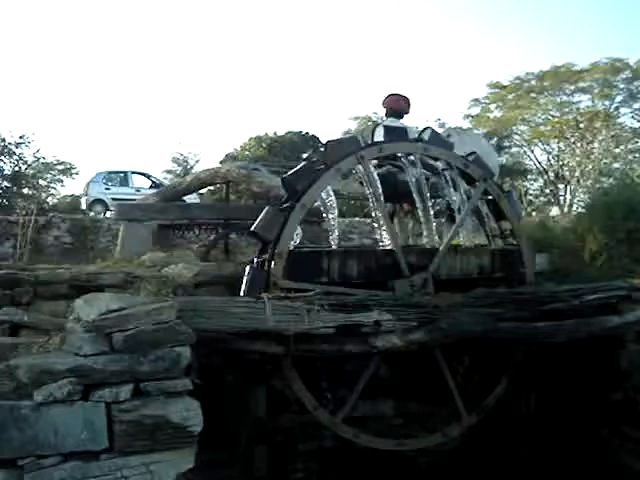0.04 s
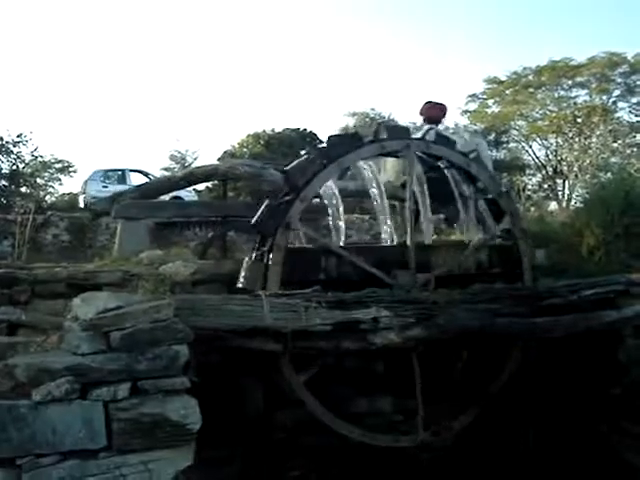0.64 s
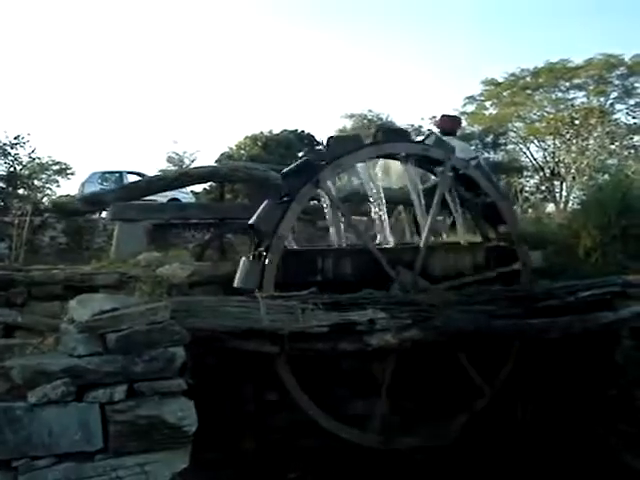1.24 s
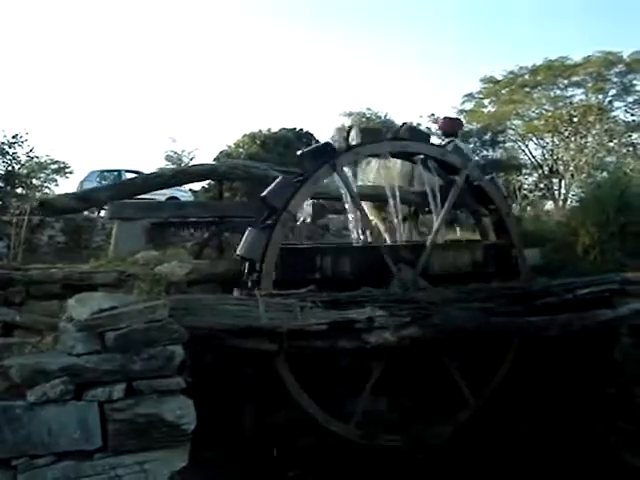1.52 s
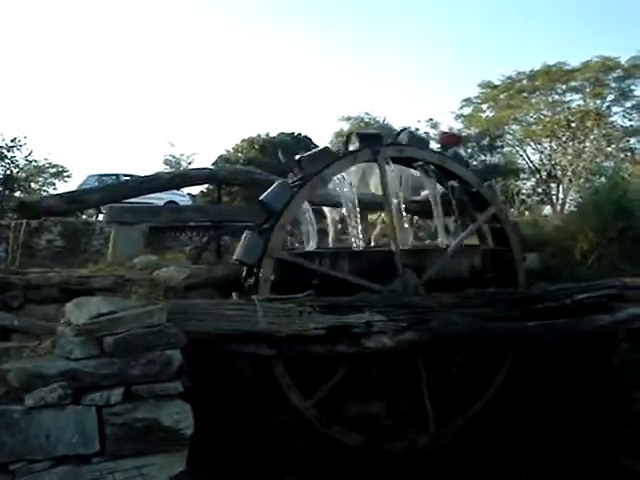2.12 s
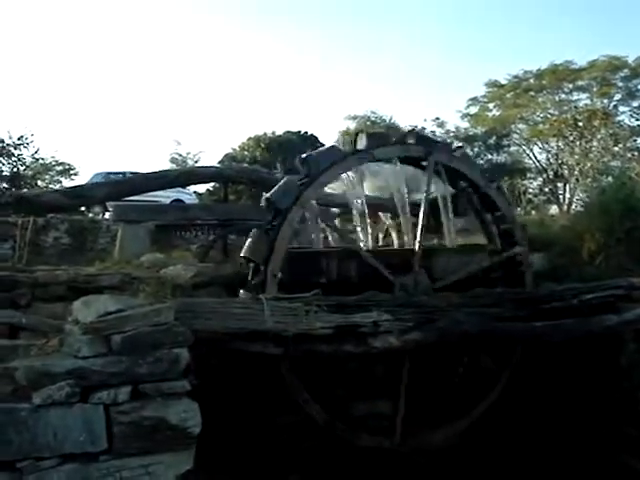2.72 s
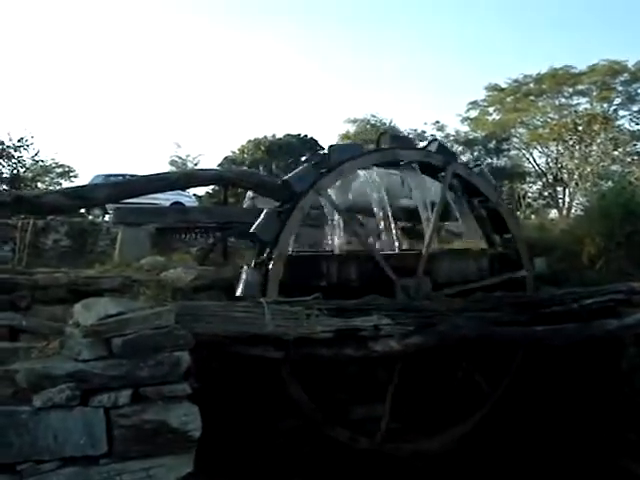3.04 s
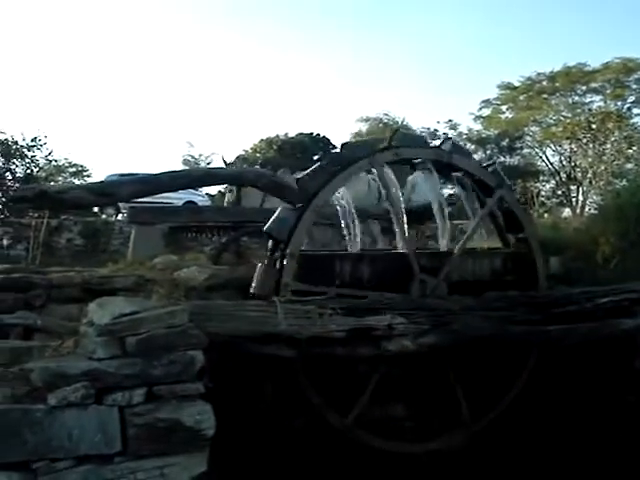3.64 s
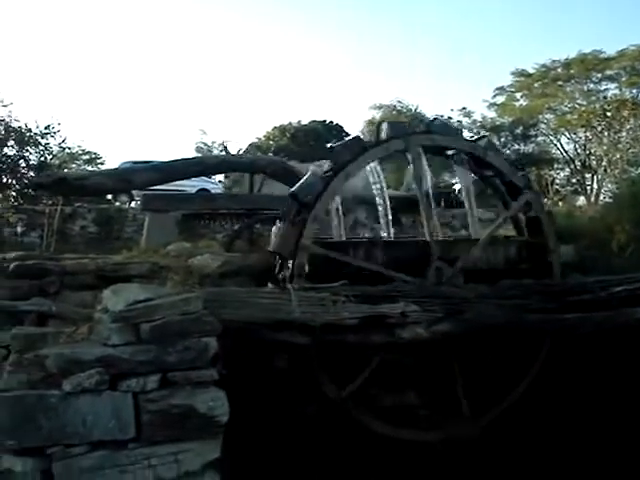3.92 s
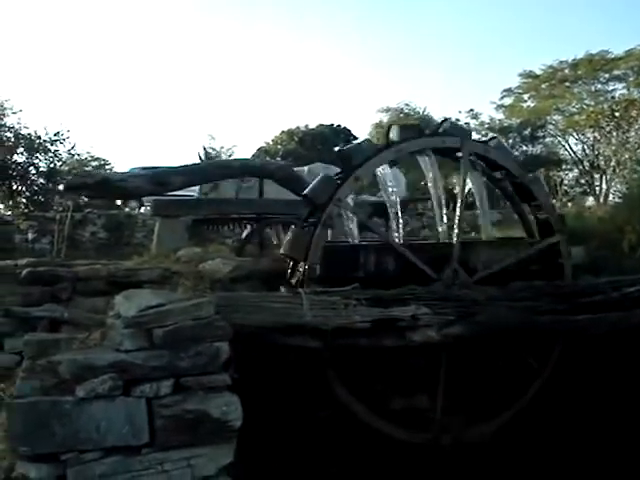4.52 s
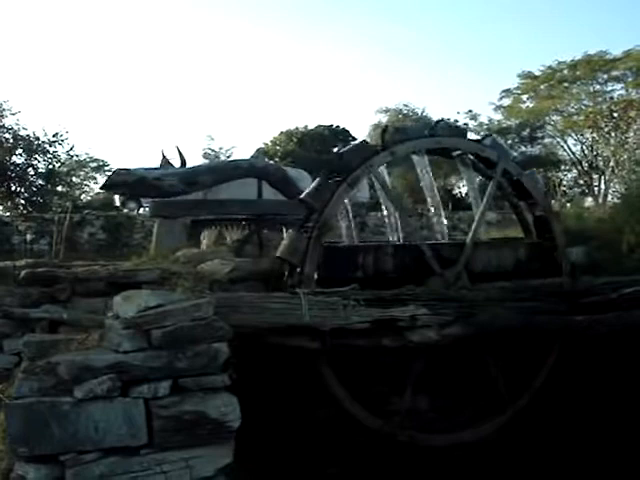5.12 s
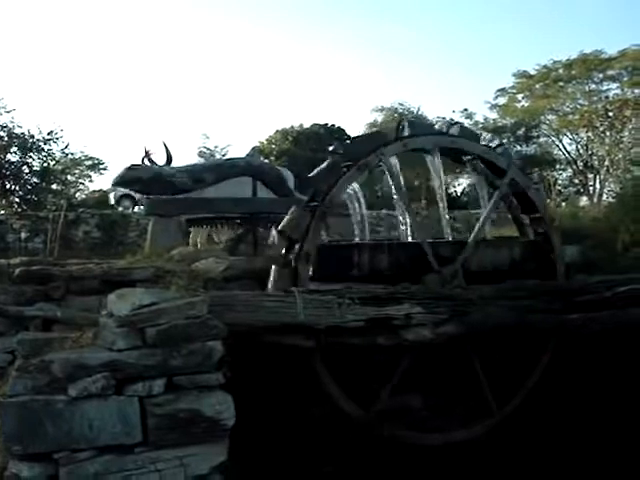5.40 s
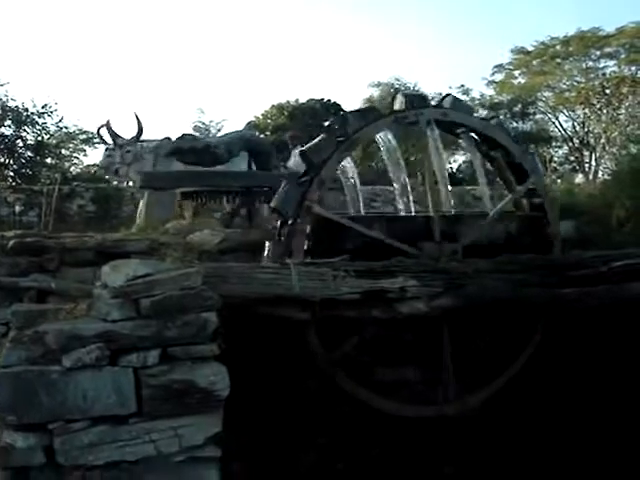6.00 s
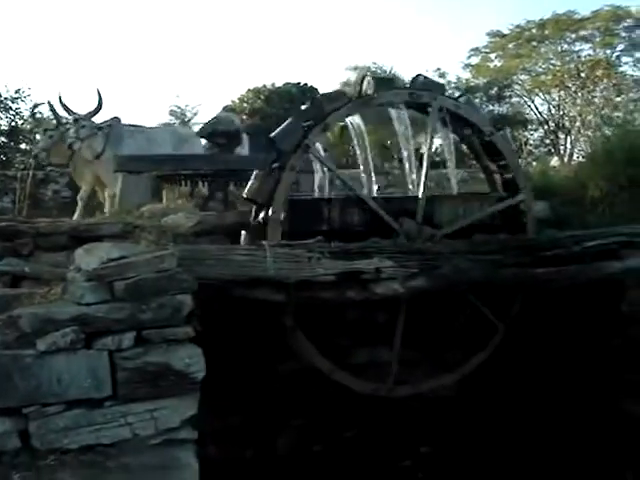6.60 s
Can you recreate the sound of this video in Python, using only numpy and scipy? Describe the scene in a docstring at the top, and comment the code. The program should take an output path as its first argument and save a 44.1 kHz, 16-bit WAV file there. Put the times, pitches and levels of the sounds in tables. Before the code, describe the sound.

Steady, ringing metal clinks from a ratchet run over the splash of a waterwheel emptying its buckets about twice a second. The water starts full, then eases, with occasional sharp slaps in the trough and hollow gurgling down the stone shaft. Short gulps, squeaks and soft thumps come from the turning wheel, mostly early on. The place is outdoors, with a short, dull echo and very faint wind on the microphone.

```python
"""Outdoors at a stone well, a bucket waterwheel turns. Its buckets empty in ragged streams that hiss,
patter and slap into a trough, while spilled water falls back and gurgles in the shaft. A steel catch
(the pawl) drops onto the next ratchet tooth three to four times a second, rings, and echoes off the
stone. Behind these come hollow knocks, gulps and squeaks, soft thumps of the frame and a faint breeze."""
import sys
import numpy as np
from scipy import signal
from scipy.fft import rfft, irfft, next_fast_len
from scipy.io import wavfile

SR = 44100
rng = np.random.default_rng(int(sys.argv[2]) if len(sys.argv) > 2 else 0)


def persist_wave(psi):
    """Save psi, clipped to +-1, as 16-bit WAV."""
    counts = np.round(np.clip(psi, -1, 1) * 32767).astype(np.int16)
    wavfile.write(sys.argv[1], SR, np.atleast_2d(counts).T)


N = 297675
TIME = np.arange(N) / SR


# the steady run of water between bucket loads: t/s, spray level/dB, trough level/dB
STEADY_FLOW = [(.32, -25.5, -31), (.85, -26, -32.5), (3.3, -30.5, -37.5), (3.59, -33, -38.5),
               (3.95, -30.5, -36), (4.29, -34.5, -35), (4.63, -33, -37.5), (5.06, -33.5, -36),
               (5.35, -39, -40), (5.84, -31.5, -38.5), (6.31, -31.5, -33.5), (6.45, -35, -35.5),
               (6.74, -31.5, -37.5)]
# how strong the spray is from low to high pitch: f/Hz, level/dB
SPRAY_TONE = [(300, -39), (1600, -15.5), (2600, -15), (3500, -11.5), (5000, -6.5), (6200, -1.5), (7000, -1),
              (7600, -8.5), (8500, -16.5), (9800, -29)]
def spray(flow_db):
    """Streams break into a hiss of drops, mist and tiny bubbles; splash and fizz flutter separately."""
    hiss = drops(per_s=8000, spread_db=5) + .62 * rng.standard_normal(N)
    hiss += .7 * bubbles(per_s=2000, low_hz=3000, high_hz=9500, cycles=100, rise=.02, spread_db=0)
    fizz = signal.sosfiltfilt(signal.butter(2, [5500, 7600], "band", fs=SR, output="sos"), hiss)
    splash = hiss - fizz
    ragged = splash * from_db(1.5 * drift(18)) + fizz * from_db(2.5 * drift(24))
    return np.hypot(from_db(flow_db) * lull(), gush()) * coloured(ragged, SPRAY_TONE)


# a bucket tips about twice a second: t/s, level/dB, time at full flow/s
BUCKET_TIPS = [(.07, -24, 0.085), (.59, -24.5, .3), (1.04, -25, 0.13), (1.561, -23.5, 0.098),
               (2.06, -24, 0.091), (2.52, -26.5, 0.24), (3.08, -31, 0.32), (3.67, -30, 0.041),
               (4.48, -29.5, 0.041), (4.7, -29, 0.032), (5.1, -34, 0.031), (5.64, -33, 0.18),
               (6.1, -33, 0.12)]
def gush(delay_s=0, rise_s=.041, fall_s=.095):
    """Strength of the water leaving the buckets: each load swells, runs, then dribbles away."""
    power = np.zeros(N)
    for s, db, hold_s in BUCKET_TIPS:
        t = TIME - s - delay_s
        swell = np.clip(t / rise_s, 0, 1)
        dribble = np.exp(-np.maximum(t - hold_s, 0) / fall_s)
        power += (from_db(db) * swell * dribble) ** 2
    return np.sqrt(power)


def lull(lead_s=.033, width_s=.032, dip_db=-2.5):
    """A dip in strength: the streams thin out just before the next bucket tips."""
    dips = sum(np.exp(-((TIME - s + lead_s) / width_s) ** 2) for s, *_ in BUCKET_TIPS)
    return from_db(dip_db * dips)


# the tone of the patter in the trough: f/Hz, level/dB
TROUGH_TONE = [(70, -43), (170, -14), (450, -11), (700, -3.5), (880, 2), (1300, -0.5), (2300, -5),
               (4000, -5.5), (6500, -13), (9500, -24.5)]
def trough(flow_db, bubbles_db=-8.5, gush_db=-12):
    """Falling drops patter on the water in the trough and trap middle-sized bubbles."""
    patter = drops(per_s=5000, spread_db=.5)
    plinks = bubbles(per_s=500, low_hz=712.7, high_hz=4500, cycles=62, rise=.071, spread_db=1.5)
    strength = np.hypot(from_db(flow_db) * np.sqrt(lull()), from_db(gush_db) * gush())
    return strength * coloured(patter + from_db(bubbles_db) * plinks, TROUGH_TONE)


# slaps of water on the trough: t/s, level/dB, fade time/s
WATER_SLAPS = [(.207, -19, 0.096), (2.063, -17, .0028), (2.706, -20, 0.0037), (2.832, -32, 0.015),
               (2.961, -26.5, 0.017), (3.099, -34, 0.016), (3.253, -23, 0.0044), (3.36, -22, 0.014),
               (4.238, -23.5, 0.013), (4.721, -21.5, 0.0061), (5.401, -25, 0.016), (5.449, -22.5, 0.0081),
               (5.668, -22, 0.016), (6.095, -21.5, .02), (6.179, -22, 0.023)]
# the bright tone of a slap: f/Hz, level/dB
SLAP_TONE = [(200, -27), (1200, -5), (4000, -0.5), (7000, 8), (9500, -18)]
def slaps(rise_s=.00044):
    """Now and then a lump of water lands all at once and scatters."""
    lumps, t = np.zeros(N), TIME[:SR // 3]
    for s, db, fall_s in WATER_SLAPS:
        add(lumps, s, from_db(db) * (1 - np.exp(-t / rise_s)) * np.exp(-t / fall_s))
    return lumps * coloured(drops(per_s=8000, spread_db=.5), SLAP_TONE)


# heavy spills plunging into the well: t/s, level/dB
HEAVY_SPILLS = [(.14, -31), (.38, -37), (.58, -36.5), (1.07, -31.5), (2.37, -43.5), (4.235, -37.5),
                (4.48, -40.5), (5.94, -38.5)]
# the hollow tone of the shaft: f/Hz, level/dB
SHAFT_TONE = [(70, -27), (170, -12), (290, -10.5), (420, -3.5), (520, -2.5), (720, -9), (1200, -19.5)]
def well(wash_db=6, steady_db=-45.5, gush_db=-36.5, spill_peak_s=.044):
    """Spilled water makes large bubbles and a wash of noise deep in the hollow shaft."""
    gurgle = bubbles(per_s=220, low_hz=185.4, high_hz=869, cycles=41, rise=.062, spread_db=2.5)
    gurgle += from_db(wash_db) * rng.standard_normal(N)
    spill = from_db(gush_db) * gush(delay_s=.014)   # water reaches the well after the trough
    strength = np.hypot(from_db(steady_db), spill)
    for s, db in HEAVY_SPILLS:
        age = np.maximum(TIME - s, 0) / spill_peak_s
        strength = np.hypot(strength, from_db(db) * age * np.exp(1 - age))
    return strength * coloured(gurgle, SHAFT_TONE)


# each drop of the pawl:
# t/s, impact level/dB, clank f/Hz, ping level/dB, chink level/dB, knock f/Hz, knock level/dB
PAWL_DROPS = [(.174, -44, 2920, -25, -31, 520, -40), (.408, -38, 2480, -29.5, -29, 515, -36),
              (0.898, -38.5, 3580, -31, -27, 415, -37.5), (1.167, -44, 2878, -27.5, -41.5, 460, -32.5),
              (1.416, -34.5, 3300, -28.5, -28.5, 492, -39.5), (1.685, -53, 3000, -31, -32, 492, -39.5),
              (1.934, -33, 2600, -29.5, -29, 473, -40), (2.198, -35.5, 2950, -31, -29.5, 506, -39.5),
              (2.481, -30.5, 3100, -31.5, -42, 513, -41.5), (2.737, -32, 2600, -37, -36, 500, -45),
              (3.028, -33, 2750, -45, -25.5, 500, -35.5), (3.306, -33, 3300, -31, -32, 480, -34),
              (3.564, -33, 2700, -27, -30.5, 467, -41), (3.838, -31.5, 2980, -25, -33, 508, -41),
              (4.127, -41.5, 3000, -29.5, -26, 474, -39.5), (4.399, -30.5, 2850, -33.5, -32, 570, -37.5),
              (4.66, -32.5, 2700, -30.5, -25.5, 483, -40), (4.929, -30.5, 3980, -35, -28, 480, -39.5),
              (5.22, -41, 3500, -24.5, -28, 477, -40), (5.497, -30.5, 2700, -37, -23.5, 539, -37.5),
              (5.767, -31, 2700, -40, -25, 500, -36), (6.061, -31, 3560, -50, -34, 480, -36),
              (6.381, -31.5, 2280, -33, -26.5, 478, -37), (6.656, -29.5, 2690, -34, -28, 475, -38.5)]
# the notes the steel rings at, in three groups: f/Hz, relative level/dB, time to fade by 60 dB/s
LOW_CLANK = [(2261, -8, .07), (2600, -6, .02), (2850, -3.5, .038), (2990, -3, .04), (3640, -5.5, .03),
             (4300, -8.5, .02)]
MIDDLE_PING = [(995, -16, .06), (4715, -5, .07), (4921, -2.5, .1), (6100, -9, .012)]
HIGH_CHINK = [(6773, 0, .065), (7150, -8.5, .03), (7485, -12, .06), (9350, -26, .08)]
def pawl(late_s=.0024, bounces_per_s=1100, chatter_s=.024, settle_s=.063,
         clank_db=-3, boost_db=6, boost_octaves=.11):
    """The pawl lands and chatters on a tooth, each time with a different mix of clank, ping and chink."""
    out, t = np.zeros(N), TIME[:SR // 4]
    settling = np.exp(-(t / settle_s) ** 4)   # coming to rest on the tooth stops the ring
    for s, impact_db, clank_hz, ping_db, chink_db, *_ in PAWL_DROPS:
        touches = rng.random(len(t)) < bounces_per_s / SR
        touches[0] = True
        groups = [(LOW_CLANK, impact_db + clank_db), (MIDDLE_PING, ping_db), (HIGH_CHINK, chink_db)]
        for order, (notes, group_db) in enumerate(groups):
            # the bounces grow lighter and sharper, so the high notes are struck last
            bounces = touches * np.exp(-((t - late_s * order) / chatter_s) ** 2)
            for hz, db, t60 in notes:
                force = bounces * rng.standard_normal(len(t))
                shove = signal.lfilter([1, 0, -1], [1], force)   # small steel parts give off no bass
                note = settling * ring(shove, hz + 7 * rng.normal(), t60)
                note /= np.std(note[:SR // 28]) + 1e-12
                # the spot that is hit favours notes near this landing's clank pitch
                spot_db = boost_db * np.exp(-(np.log2(hz / clank_hz) / boost_octaves) ** 2)
                add(out, s, note * from_db(group_db + db + spot_db + 1.6 * rng.normal()))
    return out


# the harsh tone of steel hitting steel: f/Hz, level/dB
CRACK_TONE = [(100, -39.5), (500, -7.5), (1000, 4.5), (1800, 0), (2800, 5), (3500, 2), (5300, 5.5),
              (7200, 5), (10000, -31)]
def crack(boost_db=12, rise_s=.0023, fall_s=.016, ring_share=.2, low_cut_hz=210):
    """The pawl's hit itself is a harsh rattle that dies away quickly."""
    blows, t = np.zeros(N), TIME[:SR // 5]
    for s, impact_db, _, ping_db, chink_db, *_ in PAWL_DROPS:
        ring_excess_db = max(max(ping_db, chink_db) - impact_db, 0)
        strength = from_db(impact_db + ring_share * ring_excess_db + boost_db)
        add(blows, s - rise_s, strength * (1 - np.exp(-t / rise_s)) * np.exp(-t / fall_s))
    rattle = blows * coloured(drops(per_s=9000, spread_db=1.5), CRACK_TONE)
    return signal.sosfilt(signal.butter(2, low_cut_hz, "high", fs=SR, output="sos"), rattle)


def knocks(peak_s=.033, t60=.014):
    """Each jolt of the wheel swells and fades as a hollow knock in the shaft, at its own pitch."""
    out, age = np.zeros(N), TIME[:SR // 3] / peak_s
    swell = age * np.exp(1 - age)
    for s, *_, hz, db in PAWL_DROPS:
        jolt = np.gradient(swell * rng.standard_normal(len(age)))
        hollow = ring(ring(jolt, hz, t60), hz, t60)
        add(out, s, from_db(db) * hollow * np.linalg.norm(swell) / np.linalg.norm(hollow))
    return out


# gulps, hoots and squeaks: t/s, f/Hz, level/dB, time to fade by 60 dB/s
WHEEL_NOTES = [(.6, 467, -23, 0.14), (1.075, 486, -24, .15), (1.138, 578, -19, 0.47),
               (1.669, 1040, -14, .1), (2.424, 3840, -14.5, 0.097), (2.489, 1465, -18.5, 0.12),
               (2.925, 474, -23.5, 0.23), (3.35, 450, -22, 0.13), (3.505, 225, -32.5, 0.14),
               (4.255, 505, -23, 0.14), (5.96, 442, -20.5, 0.14)]
def gulps_and_squeaks(rise_s=.015, wobble=.014):
    """The buckets and the axle give short, slightly unsteady notes that swell and die away."""
    out, t = np.zeros(N), TIME[:SR // 2]
    swell = 1 - np.exp(-t / rise_s)
    for s, hz, db, t60 in WHEEL_NOTES:
        pitch_hz = hz * (1 + wobble * drift(40)[:len(t)])
        phase = 2 * np.pi * np.cumsum(pitch_hz) / SR
        add(out, s, from_db(db) * swell * fade(t, t60) * np.sin(phase))
    return out


# soft thumps of the wheel's frame: t/s, level/dB
FRAME_THUMPS = [(.416, -28), (2.198, -38), (2.706, -43), (4.657, -46), (5.226, -46)]
def thumps(frame_hz=58, t60=.032):
    """A heavy jolt sets the frame shuddering for a few deep swings."""
    jolts = np.zeros(N)
    for s, db in FRAME_THUMPS:
        add(jolts, s, from_db([db]))
    return ring(jolts, frame_hz, t60)


def stone_echo(x, t60=.34, gap_s=.0076, dull_hz=1500):
    """Sound bounces around the stonework of the well and comes back as a dull blur."""
    t = TIME[:SR // 2]
    tail = rng.standard_normal(len(t)) * fade(t, t60) * (t > gap_s)
    echo = signal.fftconvolve(x, tail / np.linalg.norm(tail))[:N]
    return signal.sosfilt(signal.butter(2, dull_hz, fs=SR, output="sos"), echo)


# low puffs of air: t/s, level/dB, width/s
AIR_PUFFS = [(.2, -45, 0.091), (0.63, -53, 0.031)]
def wind(breeze_db=-64.5):
    """A faint breeze and brief puffs rumble on the microphone."""
    puffs = sum(from_db(db) * np.exp(-.5 * ((TIME - s) / width) ** 2) for s, db, width in AIR_PUFFS)
    rumble_tone = [(15, -1), (60, -7.5), (90, -7), (200, -14.5), (1000, -70)]   # f/Hz, level/dB
    return (from_db(breeze_db) + puffs) * coloured(rng.standard_normal(N), rumble_tone)


def drops(per_s, spread_db):
    """Tiny hits at random times, many small and a few large."""
    sizes = from_db(spread_db * np.minimum(rng.exponential(1, N), 5))
    return unit_power(sizes * rng.choice([-1, 1], N) * (rng.random(N) < per_s / SR))


def bubbles(per_s, low_hz, high_hz, cycles, rise, spread_db):
    """Each trapped bubble rings briefly and rises in pitch as it nears the surface."""
    out = np.zeros(N)
    for when, smallness, weakness, life in rng.random((int(per_s * N / SR), 4)):
        hz = low_hz * (high_hz / low_hz) ** smallness
        t60 = cycles * (.5 + life) / hz
        t = TIME[:int(t60 * SR)]
        # high bubbles are shorter and more thinly spread, so they get more strength
        strength = hz * from_db(-spread_db * np.log(max(weakness, .03)))
        phase = 2 * np.pi * hz * t * (1 + rise * t / t60)
        add(out, when * N / SR, strength * fade(t, t60) * np.sin(phase))
    return unit_power(out)


def ring(clicks, hz, t60):
    """Each click sets a pure note ringing; it fades by 60 dB in t60 seconds."""
    decay, step = fade(1 / SR, t60), 2 * np.pi * hz / SR
    return signal.lfilter([0, np.sin(step)], [1, -2 * decay * np.cos(step), decay ** 2], clicks + 1e-18)


def coloured(x, tone):
    """Shape a sound with a tone table (f/Hz, level/dB), then set its power to 1."""
    size = 2 * next_fast_len(N // 2 + 4096)
    freqs, levels = np.transpose(tone)
    curve_db = np.interp(np.log(np.fft.rfftfreq(size, 1 / SR) + 1), np.log(freqs), levels)
    # a minimum-phase filter: it rings only after a hit, never before
    cepstrum = irfft(np.log(from_db(curve_db)))
    cepstrum[1:size // 2] *= 2
    cepstrum[size // 2 + 1:] = 0
    return unit_power(irfft(rfft(x, size) * np.exp(rfft(cepstrum)))[:N])


def drift(rate_hz, hop=40):
    """A smooth random wobble, about 1 in size."""
    memory = np.exp(-2 * np.pi * rate_hz * hop / SR)
    noise = rng.standard_normal(N // hop + 2002)
    slow = signal.lfilter([1], [1, -2 * memory, memory ** 2], noise)[2000:]
    return np.interp(np.arange(N) / hop, np.arange(len(slow)), unit_power(slow))


def fade(t, t60):
    """Die away by 60 dB every t60 seconds."""
    return np.exp(-np.log(1000) * t / t60)


def from_db(db):
    """Turn decibels into a multiplier."""
    return 10 ** (np.asarray(db) / 20)


def unit_power(x):
    """Scale a sound to an average power of 1."""
    return x / np.sqrt(np.mean(x ** 2) + 1e-20)


def add(out, s, sound):
    """Mix a sound in at s seconds."""
    at = max(0, round(s * SR))
    out[at:at + len(sound)] += sound[:max(0, N - at)]


def scene(echo_db=2.5):
    """Water, ratchet, wheel and breeze add up, the same in both channels."""
    ratchet = pawl() + crack()
    times, *levels = np.transpose(STEADY_FLOW)
    spray_db, trough_db = [np.interp(TIME, times, level) for level in levels]
    water = spray(spray_db) + slaps() + trough(trough_db) + well()
    echo = from_db(echo_db) * stone_echo(ratchet)
    mono = water + ratchet + echo + knocks() + gulps_and_squeaks() + thumps() + wind()
    return np.array([mono, mono])


def record(dry, start_s=.116, ceiling=.4, bass_cut_hz=35, treble_cut_hz=10150):
    """After a moment of silence the sound starts; tall peaks are rounded, deep bass and top are cut."""
    opened = np.clip((TIME - start_s) / .002, 0, 1)
    rounded = dry * opened / (1 + (dry / ceiling) ** 4) ** (1 / 4)
    sound = signal.sosfilt(signal.butter(1, bass_cut_hz, "high", fs=SR, output="sos"), rounded)
    return signal.sosfilt(signal.ellip(12, .2, 75, treble_cut_hz, fs=SR, output="sos"), sound)


dry = scene()
out = record(dry)
persist_wave(out)
```